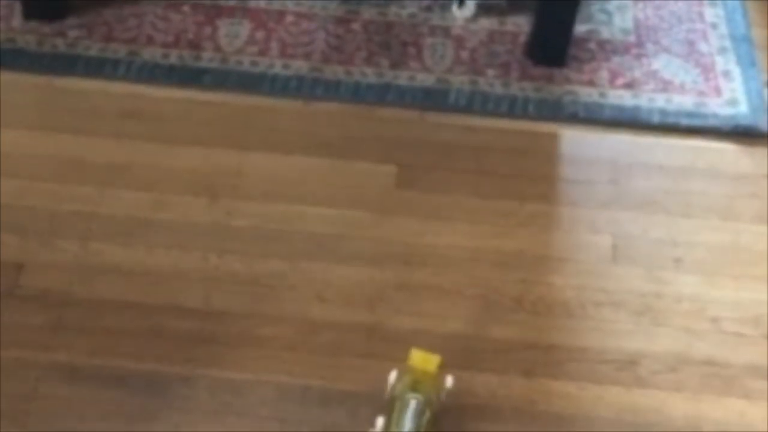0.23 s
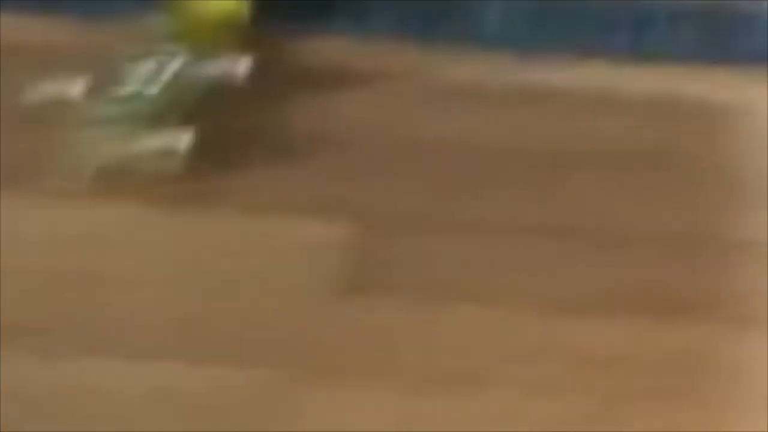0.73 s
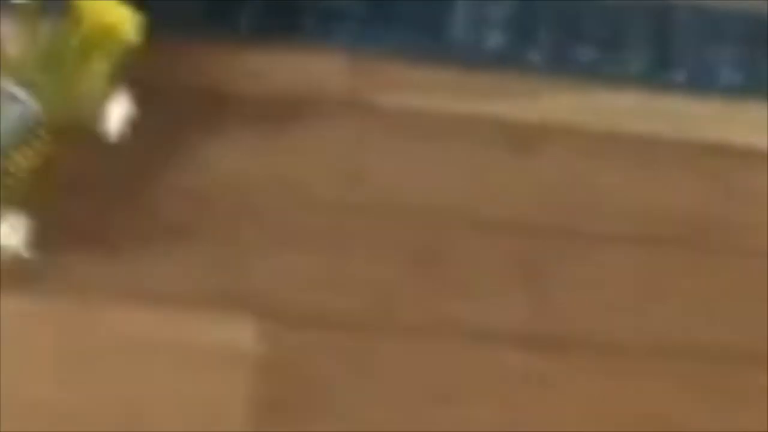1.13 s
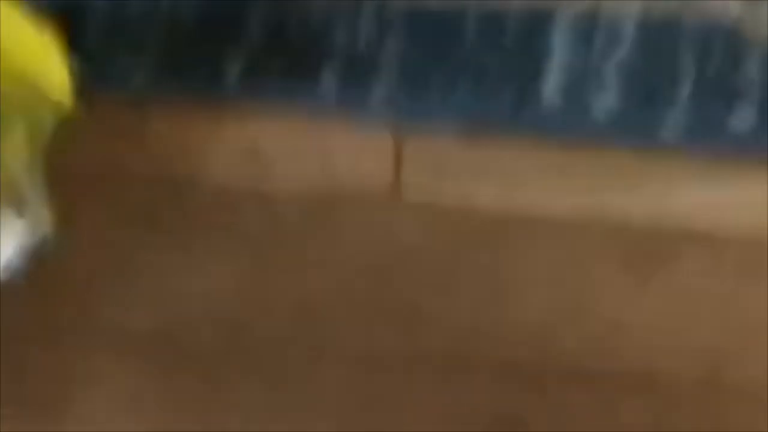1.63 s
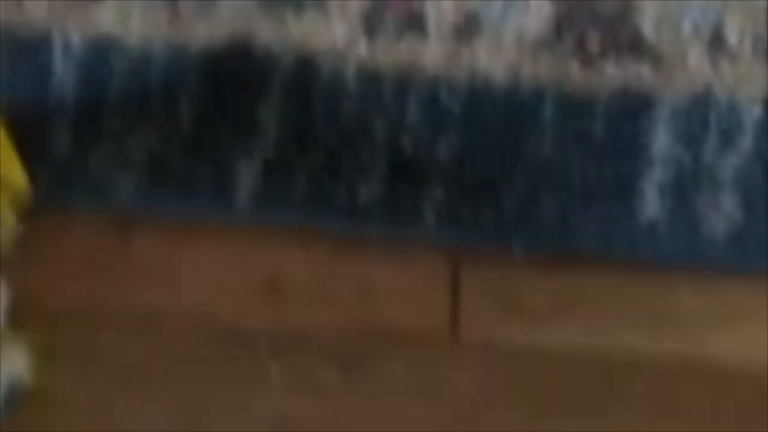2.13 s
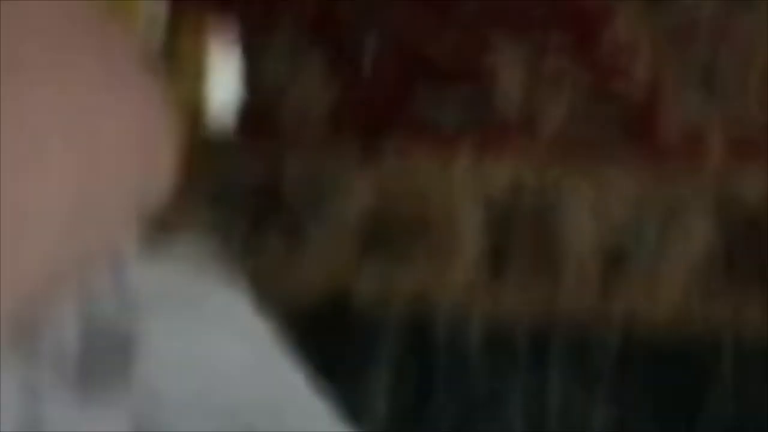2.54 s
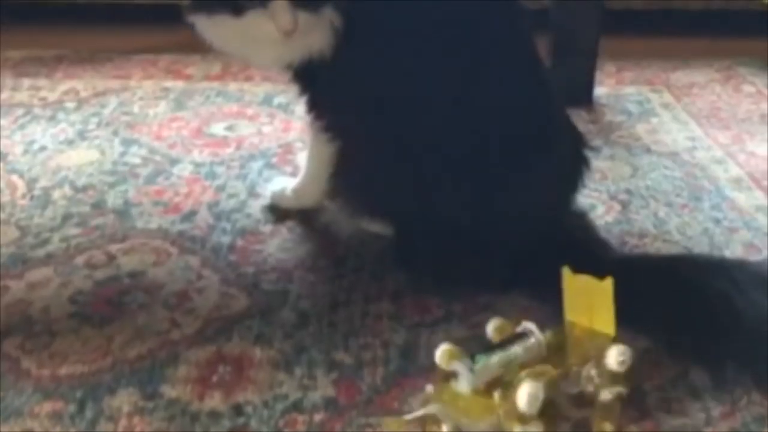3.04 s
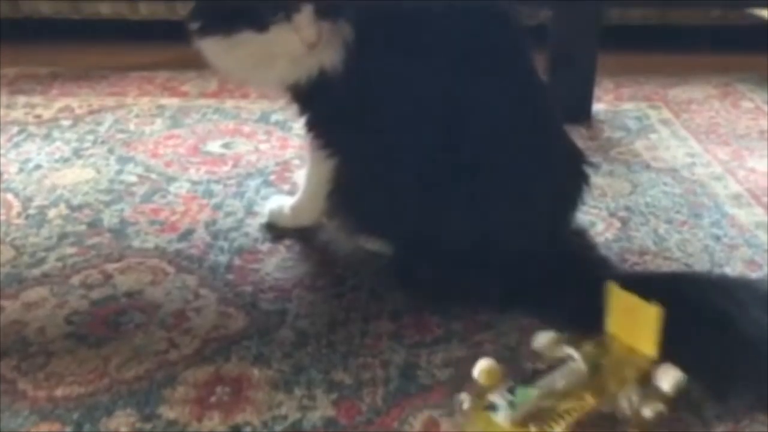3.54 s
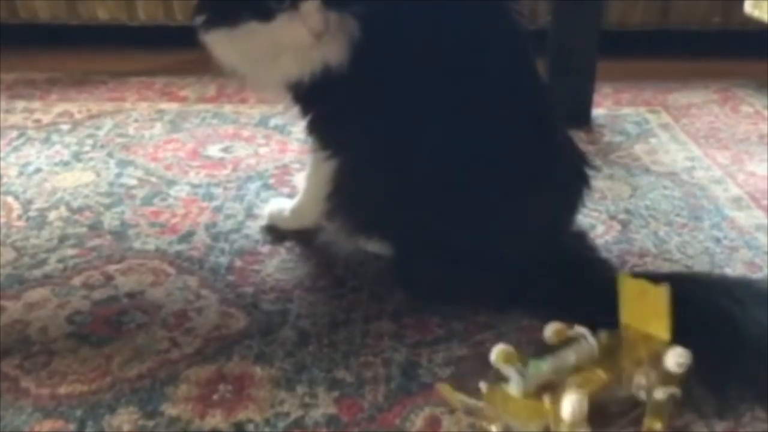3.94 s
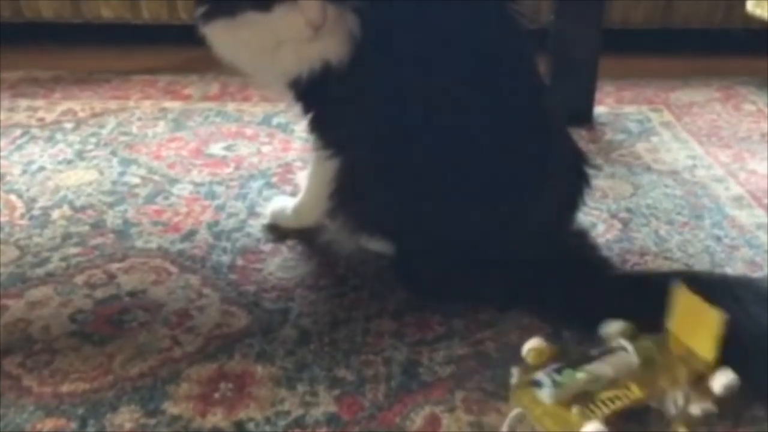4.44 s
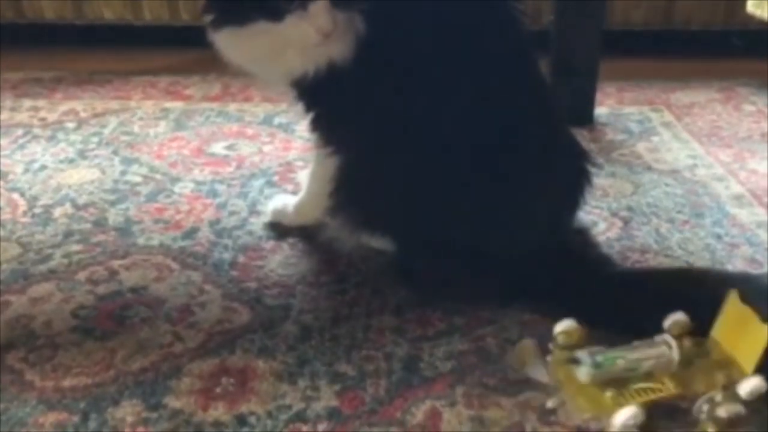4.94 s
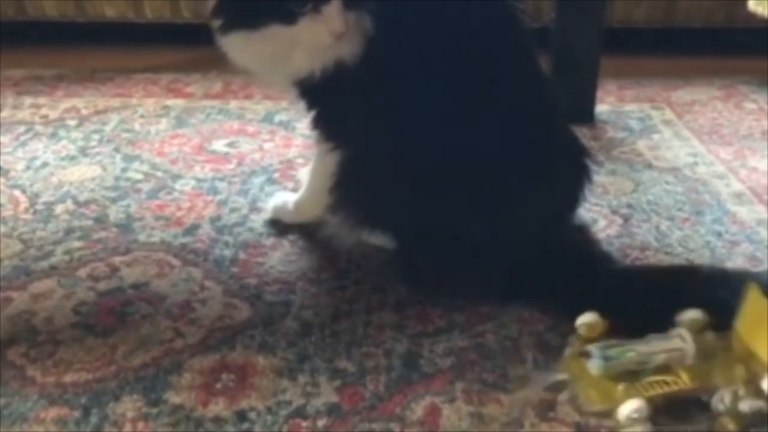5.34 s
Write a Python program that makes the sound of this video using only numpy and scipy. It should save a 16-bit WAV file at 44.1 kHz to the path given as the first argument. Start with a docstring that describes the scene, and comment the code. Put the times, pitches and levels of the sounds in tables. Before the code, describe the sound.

A small plastic toy robot clacks noisily over a wooden floor, quickening and growing louder, then whirs and ticks softly on a rug.

```python
"""A small battery toy robot walks over a hardwood floor, its plastic feet clacking, then onto a rug that mutes them.
Each footfall is damped ringing tones plus short noise bursts: floorboard, plastic shell and loose parts.
Its motor whines at the rate of the gear teeth; tooth ticks and noise through resonances make rattle and scrape.
Legs scuff and drag, gears catch and joints squeak. Soft sinking-pitch bumps sound close by.
A living room answers with fading noise tails, over low room noise and a faint hum."""
import sys
import numpy as np
from scipy import signal
from scipy.fft import rfft, irfft, next_fast_len
from scipy.io import wavfile
from scipy.ndimage import map_coordinates

SR = 44100
rng = np.random.default_rng(int(sys.argv[2]) if len(sys.argv) > 2 else 0)


def waveform_to_disk(signal):
    """Save audio, clipped to [-1, 1], as 16-bit WAV at the path in sys.argv[1]."""
    frames = np.transpose(np.atleast_2d(signal))
    scaled = np.clip(frames, -1, 1) * 32767
    samples = np.round(scaled).astype(np.int16)
    wavfile.write(sys.argv[1], SR, samples)


N = 245637

# Levels are in dB; most functions add their own offset to them.
# Foot and leg contacts: (time [s], overall level [dB], floorboard [dB], plastic shell [dB], snap [dB],
# rattle [dB], floor boom [dB], lower board tone [Hz], upper board tone [Hz], clack pitch [Hz],
# hardness of the contact as a treble limit [Hz])
FOOTFALLS = [(.048,-27.5,-22,-7.5,-9.5,-3,-47,786,1310,2390,4500),
             (.173,-36.5,-11,-4.5,-29,-16,-50,600,1240,2050,4020),
             (.261,-22.5,-10,-7.5,-10.5,-5,-48,550,696,1900,2400),
             (.426,-29.5,-20,-10.5,-10.5,0,-49,500,1150,2580,3500),
             (0.4803,-16.5,-20.5,-7,-19,-13,-42,700,1140,3680,7500),
             (.634,-30,-10.5,-9,-9,-19,-53,620,920,2240,4070),
             (0.6858,-15.5,-20.5,-13,-21,-6,-43,780,1140,2200,3320),
             (.829,-27.5,-6.5,-9.5,-7,-1.5,-42,894,1400,3100,5000),
             (.879,-13.5,-11.5,-13,-22,-13,-38.5,1007,1520,1940,3400),
             (1.073,-19.5,-4.5,-10.5,-10.5,-10.5,-52,880,1363,2070,2580),
             (1.104,-20.5,-10.5,-8.5,-24,-7.5,-41.5,785,1280,1580,2980),
             (1.255,-35,-4.5,-10,-15,-1,-57,1000,1380,2400,4000),
             (1.275,-22,-19,-10.5,-8,-2,-47,890,1430,2560,5000),
             (1.31,-14.5,-11,-14,-15.5,-12,-47,874,1075,2410,4800),
             (1.441,-18.5,-17.5,-14.5,-17.5,-5,-43,755,1310,1640,3800),
             (1.491,-31,-6.5,-14,-20,-9,-58,740,1300,1900,2980),
             (1.511,-13,-6,-14,-13.5,-21,-45,710,1254,1870,2780),
             (1.683,-29,-9.5,-11,-16,-10,-64,1050,1360,1900,3500),
             (1.708,-12,-20.5,-20.5,-13.5,-15,-42.5,680,1170,1900,3200),
             (1.738,-6.5,-18,-12,-19,-25,-36,1070,1460,3120,4400),
             (1.939,-7.5,-8.5,-25,-26,-21.5,-40,697,1253,2470,4170),
             (2.06,-19.5,-12,-7.5,-16,-18,-46,730,1070,1760,4000),
             (2.169,-13,-15.5,-14,-10,-7,-37,720,1140,2460,4500),
             (2.176,-13,-17,-10.5,-20,-14,-46,970,1480,2140,4000),
             (2.643,-12,-26.5,-12.5,-11,-12,-58,910,1420,4840,7000),
             (2.791,-23.5,-17,-13.5,-16,-3,-62,1050,1380,2600,6000),
             (4.988,-18.5,-33,-29,-14.5,-10,-53,915,1410,3270,5030)]
# Gear teeth and links catching: (time [s], level [dB], housing [dB], treble [dB], rise [s])
GEAR_CATCHES = [(0.802,-29.5,-25,-10,.004), (1.386,-28,-20,-14,0.00092), (1.66,-31,-22,-2,0.0032),
                (1.725,-30,-4,-3,0.00089), (1.877,-26.5,-17,-8,0.00082), (1.997,-27.5,-10,-1,.002),
                (2.152,-33,-2,-2,.003), (2.259,-28.5,-13,-0.5,.009), (2.3,-30.5,-16,-5,.003),
                (2.373,-30,-9.5,-6,0.0057), (2.416,-28,-7,-4,0.0033), (2.439,-24.5,-36,-8.5,0.01),
                (2.482,-34.5,-13,-2,0.0011), (2.55,-36,-4,-9,.003), (2.568,-27.5,-12,-4.5,0.0044),
                (2.654,-22,-16,-13,0.0026), (2.785,-29.5,-8,-0.5,0.0051), (2.811,-22.5,-15,-6,.008),
                (2.819,-23,-17,-11,0.00088), (2.868,-31,-24,-1,0.0024), (3.043,-35,-10,-7,.003),
                (3.134,-30,-13,-7.5,0.0046), (3.244,-31,-11,-7,0.0033), (3.275,-29,-10,-8,0.0025),
                (3.3167,-33.5,-12,-1.5,.003), (3.683,-31.5,-8.5,-5.5,0.0033), (3.91,-31.5,-7,-11,0.0048),
                (4.0544,-29.5,-14,-8,.004), (4.077,-30,-18,-7,0.0065), (4.1113,-35.5,-9,2.5,0.0031),
                (4.164,-36,-10,-3,0.0047), (4.191,-30.5,-6.5,-2.5,0.0038), (4.339,-36,-5,-6,0.0097),
                (4.503,-32,-23.5,-16,0.0035), (4.552,-33.5,-12,-4.5,0.0019), (4.866,-38.5,-16,0,0.0036),
                (5.0942,-30.5,-13,-7,0.0032), (5.479,-38.5,-5,1.5,0.0034)]
# Soft bumps: (time [s], level [dB], nominal pitch [Hz], time to fall 60 dB [s])
SOFT_BUMPS = [(.497,-35,270,0.039), (.703,-34.5,260,0.034), (.868,-27,292,0.027), (0.947,-32,171,.026),
              (1.130,-35.5,228,0.047), (1.618,-31,215,0.029), (1.678,-31.5,189,0.026),
              (2.122,-29,173,0.022), (2.404,-42,400,.015), (2.63,-28.5,410,0.022), (2.674,-43,199,0.037),
              (2.708,-28.5,268,0.023), (2.742,-31.5,217,0.023), (2.773,-28.5,240,.028),
              (2.795,-32,211,0.023)]
# Ringing tones of the plastic shell: (nominal pitch [Hz], level [dB], time to fall 60 dB [s])
SHELL_MODES = [(1870, -0.5, 0.025), (2165, 2.5, 0.0087), (2760, 8, 0.0049), (3070, -12.5, 0.03),
               (3670, -3, 0.015), (4140, -7, 0.0076), (4670, -9, 0.01)]
# Resonances of the gearbox: (centre [Hz], width [Hz], level [dB])
GEARBOX_PEAKS = [(1048, 160, -1), (1434, 134, -1.5), (1716, 137, -4.5), (2120, 270, -4.5), (2662, 410, 1),
                 (3050, 770, -3), (5050, 800, -4)]
# Resonances of the motor housing: (centre [Hz], width [Hz], level [dB])
HOUSING_PEAKS = [(2780, 250, -3.5), (3106, 146, 1), (3280, 290, 0), (4980, 190, -12)]
# Resonances of the slot a leg slides in: (centre [Hz], width [Hz], level [dB])
SLOT_PEAKS = [(6020, 440, 1), (6680, 370, -0.99), (7500, 500, -2.2), (8700, 1100, -0.36), (9620, 320, 0.16)]
# Low resonances of the whole floor: (centre [Hz], width [Hz], level [dB])
FLOOR_PEAKS = [(171, 51, 0), (300.5, 43, 3.5), (557, 440, -6)]
# Tone colour of the gear rattle: (frequency [Hz], level [dB])
RATTLE_COLOUR = [(500, -69), (900, 1), (1050, 1.5), (1600, 7), (3400, 0), (4000, 0), (5200, 1.5), (7000, 8),
                 (12000, -7)]
# Tone colour of the linkage scrape: (frequency [Hz], level [dB])
SCRAPE_COLOUR = [(2500, -16), (4200, -2), (5100, 3.5), (6200, 3), (7300, -2), (8700, 4), (10200, -0.5),
                 (11600, -8)]
# Tone colour of the snap in a footfall: (frequency [Hz], level [dB])
SNAP_COLOUR = [(1500, -14), (4000, -5.5), (5600, 4), (7200, 0.5), (9000, -0.5), (11500, -4.5)]
# Tone colour of the deep floor rumble: (frequency [Hz], level [dB])
RUMBLE_COLOUR = [(30, -54), (90, -22), (140, 1.5), (195, 4), (300, -4.5), (450, -11), (800, -16)]
# Tone colour of the floor buzz: (frequency [Hz], level [dB])
BUZZ_COLOUR = [(200, -8.5), (420, 2.5), (720, 7), (1000, 4.5), (1400, -1), (2500, -25)]
# Tone colour of the room noise: (frequency [Hz], level [dB])
AIR_COLOUR = [(22, -21), (45, -6), (60, 1.5), (70, 1), (90, -1.5), (130, -2), (250, -23), (600, -24.5),
              (3000, -18.5), (12000, -37)]
# Tone colour of the room's answer: (frequency [Hz], level [dB])
ECHO_COLOUR = [(60, -9), (130, -0.5), (220, -34), (420, -12.5), (700, -4), (1500, -2.5), (4000, 1.5),
               (11000, 3)]
# How long the room's answer lasts: (frequency [Hz], time to fall 60 dB [s])
ECHO_DECAY = [(150, 1), (600, 0.58), (2500, 0.35), (6000, 0.18), (11000, 0.27)]
# Each stride starts as a leg slides back in its slot:
# (time [s], scuff level [dB], extra strain that lifts the rubbing [dB])
STRIDE_STARTS = [(-.03, -55, -13), (0.393, -51, 7), (0.789, -48, -15), (1.219, -50, -9), (1.641, -48, -2.5),
                 (1.989, -55, 13.5), (2.649, -57, -11), (2.873, -46.5, 6), (3.309, -50.5, 5),
                 (3.743, -51, 4), (4.177, -49, -1), (4.606, -48, -2.5), (5.04, -48, 5), (5.478, -49, -2)]
# Every turn of the crank works the links: (time into the stride [s], rubbing [dB])
CRANK_RUBBING = [(.02,3),(.09,-5.5),(.16,2.5),(.21,-1.5),(.27,2),(.345,1),(.364,-9),(.38,-1.5),(.41,-4)]
# Motor speed before small drifts, sagging under load: (time [s], tooth rate [Hz])
TOOTH_RATE = [(2.78, 1057), (2.8, 1082), (2.83, 1028), (2.91, 1095), (3.02, 1095), (3.27, 1032),
              (3.29, 1083), (3.46, 1104), (3.47, 1081), (3.64, 1049), (3.66, 1080), (3.88, 1105),
              (3.91, 1040), (3.99, 1067), (4.04, 1043), (4.12, 1088), (4.19, 1045), (4.27, 1087),
              (4.49, 1055), (4.78, 1088), (4.99, 1040), (5.02, 1076), (5.16, 1080), (5.17, 1036),
              (5.2, 1112), (5.23, 1062), (5.41, 1055), (5.44, 1098), (5.55, 1094), (5.57, 1120)]
# Loudness of the drive as the toy moves about:
# (time [s], gear rattle [dB], housing ring [dB], linkage scrape [dB])
DRIVE_LEVELS = [(0.0, -54, -47, -50), (0.31, -53.5, -62.5, -73), (0.74, -53, -59, -72.5),
                (0.88, -50.5, -50.5, -61), (1.16, -55, -60, -51), (1.3, -52, -50.5, -50),
                (2.11, -51, -58.5, -48), (2.28, -60, -56.5, -49), (2.45, -60.5, -72, -56),
                (2.74, -53, -54, -47.5), (2.95, -53.5, -55, -54.5), (3.99, -54.5, -54.5, -54),
                (4.78, -54.5, -53.5, -51), (5.18, -54, -56, -49.5), (5.57, -55.5, -54.5, -49.5)]
# Motor shaking the floor: (time [s], rumble [dB], buzz [dB])
FLOOR_SHAKE = [(0, -54, -58), (1.15, -50.5, -60), (1.35, -45.5, -56), (1.77, -53, -60),
               (2.15, -46.5, -45.5), (2.27, -64, -63.5), (2.9, -58.5, -71.5), (5.57, -58, -71)]
# Dry leg joints squeak: (time [s], length [s], pitch [Hz], width [Hz], level [dB])
JOINT_SQUEAKS = [(0,0.25,2710,170,-61), (.386,0.07,5900,170,-54), (.783,0.035,5900,170,-53),
                 (1.634,.034,5860,170,-50), (2.413,.07,2830,90,-49.5), (2.48,.1,2900,91,-54),
                 (2.615,.028,5450,200,-52), (2.648,0.12,3045,250,-48.5), (2.654,0.037,8700,350,-41),
                 (2.809,.061,2074,130,-46), (3.16,0.037,3188,119.7,-48), (3.57,0.051,3260,120,-48),
                 (4.02,.088,3200,120,-52), (4.116,0.064,3270,150,-48), (4.183,.02,3190,150,-45)]
# The motor strains as the legs push the body up:
# (time of the hardest point [s], rise [s], fall [s], strain [dB])
BODY_PUSHES = [(2.83,0.046,.05,-4), (2.91,.061,0.054,-6.5), (3.14,0.096,0.1,0.5), (3.21,.03,.04,-5),
               (3.282,0.019,0.017,-2), (3.325,0.021,0.037,-7), (3.565,0.12,0.09,-0.5),
               (3.781,0.045,.045,-7.5), (3.859,0.023,0.024,-7), (4.004,0.076,0.059,-0.5),
               (4.07,0.048,0.06,-4), (4.168,.059,0.053,-2), (4.24,.03,0.044,-6.5), (4.45,0.16,0.046,2),
               (4.495,.02,0.039,-1.5), (4.885,.12,0.1,-2), (5.015,0.027,0.024,-7.5),
               (5.095,0.051,0.021,-0.5), (5.315,.11,.1,-0.5)]
# Feet drag over the floor: (time [s], length [s], centre [Hz], width [Hz], level [dB])
FOOT_DRAGS = [(1.971,0.07,1780,1200,-42), (2.665,.06,1350,900,-47), (2.716,0.174,4850,1200,-49),
              (2.722,0.195,1650,1820,-54.5), (3.086,0.1,450,600,-60)]

TEETH = 8  # on the motor's pinion (small gear)
TOP_HZ = 11950  # upper limit of the final sound
STRIDE_S, SLIDE_S = 0.43, 0.084  # one turn of the crank; length of the scuff
WHINE_WOOD_DB, WHINE_RUG_DB = -62.5, -50.5  # the pile makes the motor work harder
RUG_EDGE_S, ON_RUG_S = 2.4, 2.8  # the front feet reach the rug; all feet are on it
CLOSE_S = .75  # the toy is farther off, and more of the room is heard, until then
CONTACT_LAG_S = 0.000989  # every footfall's knock and clack sound this long after its table time


def amp(db):
    """Turns decibels into a gain."""
    return 10 ** (np.asarray(db) / 20)


def unit(x):
    """Scales a sound to an average (rms) strength of 1."""
    return x / np.sqrt(np.mean(x ** 2) + 1e-20)


def along(points, hz):
    """Reads (frequency, value) points on a logarithmic frequency axis."""
    f, v = np.transpose(points)
    return np.interp(np.log(hz + 1), np.log(f + 1), v)


def curves(rows):
    """Joins the points of each column after the time by straight lines, one value per sample."""
    s, *cols = np.transpose(rows)
    return [np.interp(np.arange(N) / SR, s, c) for c in cols]


def wobble(rate):
    """A smooth random curve through `rate` random points a second."""
    knots = rng.standard_normal(int(N * rate / SR) + 4)
    return map_coordinates(knots, [np.arange(N) * rate / SR])


def filtered(x, response):
    """Multiplies each frequency in x by a gain, which may also shift its phase."""
    m = next_fast_len(len(x) + 8192)
    return irfft(rfft(x, m) * response(np.fft.rfftfreq(m, 1 / SR)), m)[:len(x)]


def coloured(x, spectrum):
    """Gives x a tone colour, at rms 1."""
    return unit(filtered(x, lambda hz: amp(along(spectrum, hz))))


def resonant(x, peaks):
    """Sends x through a set of resonances with alternating signs, at rms 1."""
    def response(f):
        total = 0
        for k, (centre, width, db) in enumerate(peaks):
            peak = 1j * f * width / (centre * centre - f * f + 1j * f * width)
            total = total + (-1) ** k * amp(db) * peak
        return total
    return unit(filtered(x, response))


def add(track, s, sound):
    """Mixes a sound into the track at time s."""
    start = max(round(s * SR), 0)
    track[start:start + len(sound)] += sound[:max(N - start, 0)]


def burst(t, t60):
    """Noise that dies away by 60 dB in t60 seconds."""
    return rng.standard_normal(len(t)) * amp(-60 * t / t60)


def slips(rate_hz=135, depth_db=12):
    """Uneven stick and slip: a gain that jumps up at each slip and dies away."""
    slip_rate = rate_hz * amp(2.7 * wobble(100))
    since_slip = np.cumsum(slip_rate) / SR % 1  # 0 to 1 between slips
    return unit(amp(-depth_db * since_slip))


def shifting(x, depth_s=.0007, rate=13):
    """Resonances of loose parts slide slightly up and down as they flex, by a wandering delay."""
    return map_coordinates(x, [np.arange(N) + depth_s * SR * wobble(rate)], mode="mirror")


def room(x):
    """The room's answer: a new random noise tail each time, with its own decay at each frequency."""
    hz, t, z = signal.stft(rng.standard_normal(SR // 2), SR, nperseg=256)
    decay = amp(-60 * t / along(ECHO_DECAY, hz)[:, None])
    onset = 1 - np.exp(-t / 0.002)
    tail = signal.istft(z * decay * onset, SR, nperseg=256)[1]
    tail = filtered(tail / np.linalg.norm(tail), lambda f: amp(along(ECHO_COLOUR, f)))
    return signal.fftconvolve(x, tail)[:len(x)]


def background(air_db=-62, hum_db=-69, hum_hz=70):
    """Low room noise with a faint hum whose phase drifts a little."""
    phase = 2 * np.pi * hum_hz * np.arange(N) / SR + .5 * wobble(4.6)
    hum = np.sqrt(2) * np.sin(phase)
    air = coloured(rng.standard_normal(N), AIR_COLOUR)
    return amp(air_db) * air + amp(hum_db) * hum


def bumps(level_db=2, sag=2.44, sink_share=0.088, puff_db=-10):
    """Dull, padded thumps with a puff of noise; their pitch sinks as they die."""
    out, t = np.zeros(N), np.arange(SR // 8) / SR
    for s, db, hz, t60 in SOFT_BUMPS:
        sinking_hz = hz * (0.47 + sag * np.exp(-t / (sink_share * t60)))
        thump = np.sin(2 * np.pi * np.cumsum(sinking_hz) / SR)
        puff = amp(puff_db) * resonant(rng.standard_normal(len(t)), [(hz, 250, 0)])
        fade = amp(db + level_db - 60 * t / t60) * (1 - np.exp(-t / 0.0028))
        add(out, s, fade * (thump + puff))
    return out + amp(-6.0) * room(out)


def floorboards(rumble_db=-1.5, buzz_db=1):
    """The running motor shakes bare boards through the legs; the rug damps this."""
    low_db, mid_db = curves(FLOOR_SHAKE)
    rumble = amp(low_db + rumble_db) * coloured(rng.standard_normal(N), RUMBLE_COLOUR)
    uneven = rng.standard_normal(N) * amp(6.3 * np.minimum(wobble(80), 1.5))
    buzz = amp(mid_db + buzz_db) * coloured(uneven, BUZZ_COLOUR)
    return rumble + buzz


def squeaks(room_db=-8, hoarse_db=5, flutter=.014):
    """A joint sticks and slips: a fluttering tone in a narrow, hoarse band of noise."""
    out = np.zeros(N)
    for s, length, hz, width_hz, db in JOINT_SQUEAKS:
        size = int(length * SR)
        pitch = hz * (1 + flutter * wobble(144)[:size])
        tone = np.sin(2 * np.pi * np.cumsum(pitch) / SR)
        tone = unit(tone * amp(3.7 * wobble(108)[:size]))
        rub = resonant(rng.standard_normal(SR // 2), [(hz, width_hz, 0)])[:size]
        squeak = unit(tone + amp(hoarse_db) * rub)
        add(out, s, amp(db) * squeak * signal.windows.tukey(size, .5))
    return out + amp(room_db) * room(out)


def drags():
    """A dragging foot gives a broad, grainy rustle: noise in a band, broken up by slips."""
    out = np.zeros(N)
    for s, length, hz, width_hz, db in FOOT_DRAGS:
        size, band = int(length * SR), [(hz, width_hz, 0)]
        rustle = resonant(resonant(rng.standard_normal(size), band), band)
        add(out, s, amp(db) * rustle * signal.windows.tukey(size, .4))
    return out * slips()


def slides(level_db=-1):
    """Plastic rubs on plastic in a short, bright scuff as a leg slides in its slot."""
    t, stroke = np.arange(N) / SR, np.zeros(N)
    for s, db, _ in STRIDE_STARTS:
        progress = np.clip((t - s) / SLIDE_S, 0, 1)
        stroke += amp(db) * np.sqrt(np.clip(np.sin(np.pi * progress), 0, 1))
    return amp(level_db) * stroke * resonant(rng.standard_normal(N) * slips(), SLOT_PEAKS)


def gearbox(x):
    """The hollow plastic gearbox rings at its resonances and radiates little bass."""
    return coloured(resonant(x, GEARBOX_PEAKS), RATTLE_COLOUR)


def catches(gear_db=-37, housing_db=-25, treble_db=-27, room_db=-7,
            housing_t60=0.019, gear_t60=0.038, treble_t60=0.052):
    """Slack in the drive takes up with a short rasp that swells and dies."""
    out, t = np.zeros(N), np.arange(SR // 2) / SR
    for s, db, housing, treble, rise_s in GEAR_CATCHES:
        after = np.maximum(t - rise_s, 0)
        swell = np.minimum(t / rise_s, 1)
        rasp = amp(gear_db) * gearbox(burst(after, gear_t60) * swell)
        rasp += amp(housing + housing_db) * resonant(burst(after, housing_t60) * swell, HOUSING_PEAKS)
        rasp += amp(treble + treble_db) * coloured(burst(after, treble_t60) * swell, SCRAPE_COLOUR)
        add(out, s, amp(db) * (rasp + amp(room_db) * room(rasp)))
    return out


def strain(idle_db=-12.5):
    """Load on the motor, about 1 in a hard push, never below that of idle running."""
    t, load = np.arange(N) / SR, np.full(N, amp(idle_db))
    for s, rise, fall, db in BODY_PUSHES:
        offset = np.clip((t - s) / np.where(t < s, rise, fall), -1, 1)
        load = np.maximum(load, amp(db) * np.cos(np.pi / 2 * offset))
    return load


def stride_time():
    """For each sample: seconds since the present stride began, and that stride's extra strain in dB."""
    t = np.arange(N) / SR
    starts, _, extra_db = np.transpose(STRIDE_STARTS)
    now = np.maximum(np.searchsorted(starts, t) - 1, 0)
    return t - starts[now], extra_db[now]


def crank(rub_grows=0.21):
    """Rubbing in dB: every stride has the same pattern, lifted in a hard one."""
    since, extra_db = stride_time()
    return np.interp(since, *np.transpose(CRANK_RUBBING), period=STRIDE_S) + rub_grows * extra_db


def whine(load, drift_hz=3, octave_db=-17, third_db=-12, eccentric=0.1):
    """Meshing teeth sing louder under strain as the motor slows; also gives the motor shaft's turns."""
    mesh_hz = curves(TOOTH_RATE)[0] + drift_hz * wobble(14)
    mesh_db = np.interp(np.arange(N) / SR, [RUG_EDGE_S, ON_RUG_S], [WHINE_WOOD_DB, WHINE_RUG_DB])
    turns = np.cumsum(mesh_hz * (1 + .014 * load * wobble(130))) / SR / TEETH
    tooth = 2 * np.pi * TEETH * turns
    # an off-centre pinion adds a tone higher by one shaft rate
    tone = np.sin(tooth) + eccentric * np.sin(tooth + 2 * np.pi * turns)
    tone += amp(octave_db) * np.sin(2 * tooth) + amp(third_db) * np.sin(3 * tooth)
    return amp(mesh_db) * load * unit(tone * amp(2.1 * wobble(90))), turns


def tooth_ticks(turns, scatter_db, wander, swing_db):
    """One tick per tooth, uneven in size and time (wander in s), its strength swinging once a turn."""
    at = np.flatnonzero(np.diff(np.floor(turns * TEETH)))
    size, late = rng.standard_normal((2, N // 20))[:, :len(at)]
    where = np.clip(at + np.round(late * wander * SR).astype(int), 0, N - 1)
    tick_db = scatter_db * np.minimum(size, 2) + swing_db * np.cos(2 * np.pi * turns[at])
    return unit(np.bincount(where, amp(tick_db), N))


def drive(rattle_db=1, housing_db=0.0, scrape_db=-2.5, rattle_follows=0.21, housing_follows=1.3,
          scrape_follows=1.0, slide=1.0, room_db=-7):
    """The pinion sings at the tooth rate, rattles the gearbox and works the leg linkage."""
    load, rub_db = strain(), crank()
    tone, turns = whine(load)
    gear_db, ring_db, link_db = curves(DRIVE_LEVELS)
    # loose parts bind and free themselves, all shaken together, harder under load
    judder = 1.2 * wobble(65) + 1.43 * load - 1.2

    def teeth():
        ticks = tooth_ticks(turns, scatter_db=6.0, wander=.00022, swing_db=2.0)
        return ticks + 0.4 * rng.standard_normal(N)

    rattle = amp(gear_db + rattle_db + rattle_follows * rub_db + judder)
    rattle *= shifting(gearbox(teeth())) * slips(rate_hz=61, depth_db=2)
    housing = amp(ring_db + housing_db + housing_follows * rub_db + judder + 0.5 * wobble(90))
    housing *= shifting(resonant(teeth(), HOUSING_PEAKS))
    friction = slide * rng.standard_normal(N) * amp(3.7 * np.cos(2 * np.pi * turns))
    link_ticks = tooth_ticks(turns, scatter_db=16.5, wander=0.00023, swing_db=-5.0)
    scrape = coloured(link_ticks + friction, SCRAPE_COLOUR)
    scrape *= amp(link_db + scrape_db + scrape_follows * rub_db + 0.73 * judder + 2.46 * wobble(140))
    whirr = rattle + housing + scrape
    return tone + whirr + amp(room_db) * room(whirr)


def booms(level_db=-13.5, joists_near_db=-8, joists_far_db=1, rise_s=0.0042):
    """The whole floor gives slowly under each footfall: low noise that swells and fades."""
    out, t = np.zeros(N), np.arange(SR // 2) / SR
    for s, _, _, _, _, _, boom_db, *_ in FOOTFALLS:
        joists_db = joists_far_db if s < CLOSE_S else joists_near_db
        boom = coloured(burst(t, t60=0.15), RUMBLE_COLOUR)
        boom += amp(joists_db) * resonant(burst(t, t60=0.36), FLOOR_PEAKS)
        add(out, s, amp(level_db + boom_db) * boom * (1 - np.exp(-t / rise_s)) ** 2)
    return out


def board_ring(t, lower_hz, upper_hz, upper_db=-2.5, noise_db=-4, low_cut_hz=440):
    """The board's two main tones at the spot that is struck; it radiates little bass."""
    def mode(hz, t60):
        return unit(np.sin(2 * np.pi * hz * t) * amp(-60 * t / t60) * (1 - np.exp(-t / 0.0024)))

    tones = unit(mode(lower_hz, t60=0.015) - amp(upper_db) * mode(upper_hz, t60=0.012))
    middle_hz = np.sqrt(lower_hz * upper_hz)
    wood = tones + amp(noise_db) * resonant(burst(t, t60=0.025), [(middle_hz, 1000, 0)])
    return unit(signal.sosfilt(signal.butter(3, low_cut_hz, "high", fs=SR, output="sos"), wood))


def ring(modes, t, near_hz, falloff_db):
    """Fading tones; the spot that is struck favours those near one pitch."""
    hz, db, t60 = np.transpose(modes)[:, :, None]
    size, detune, side = rng.standard_normal((3, len(modes), 1))
    level = db + 2 * size - falloff_db * abs(np.log2(hz / near_hz))
    tones = np.sin(2 * np.pi * hz * (1 + 0.061 * detune) * t)
    return np.sum(np.sign(side) * amp(level - 60 * t / t60) * tones, axis=0)


def shell_clack(t, clack_hz, hard_hz, tick_db=2, noise_db=-2, gear_db=-4):
    """A tight tick and the shell's ring; a softer contact takes the top off both."""
    tick = unit(np.sin(2 * np.pi * clack_hz * t) * amp(-60 * t / 0.005))
    grit = resonant(burst(t, t60=0.0074), [(clack_hz, 900, 0)])
    plastic = unit(ring(SHELL_MODES, t, clack_hz, falloff_db=5))
    plastic += amp(tick_db) * tick + amp(noise_db) * grit
    plastic += amp(gear_db) * gearbox(burst(t, t60=0.065))
    return unit(signal.sosfilt(signal.butter(3, min(hard_hz, SR / 3), fs=SR, output="sos"), plastic))


def rebounds(t, rate_hz=260, t60=0.27, scatter_db=4, wait_s=0.0036):
    """Sparse, uneven kicks of loose parts bouncing after a blow, of total energy 1."""
    chance, size = rng.random(len(t)), rng.standard_normal(len(t))
    side = rng.choice([-1, 1], len(t))
    happens = (chance < rate_hz / SR) * (t > wait_s)
    kicks = happens * side * amp(scatter_db * np.minimum(size, 1.5) - 60 * t / t60)
    return kicks / (np.linalg.norm(kicks) + 1e-9)


def steps(board_db=-22.5, shell_db=-22.0, snap_db=-22, chatter_db=-17, rattle_db=-1, room_db=-6.5,
          far_db=3, board_room_db=-4.5):
    """Each footfall knocks the board, rings the shell and sets loose parts rattling."""
    out, t = np.zeros(N), np.arange(SR // 2) / SR
    for s, db, board, shell, snap, rattle, _, lower_hz, upper_hz, clack_hz, hard_hz in FOOTFALLS:
        knock = amp(board + board_db) * board_ring(t, lower_hz, upper_hz)
        clack = amp(shell + shell_db) * shell_clack(t, clack_hz, hard_hz)
        chatter = amp(chatter_db) * burst(t, t60=0.11)
        crack = amp(snap + snap_db) * coloured(burst(t, t60=0.015) + chatter, SNAP_COLOUR)
        toy = clack * (1 - np.exp(-t / 0.00039)) + crack * (1 - np.exp(-t / 0.00045))
        # the knock and a short tap are repeated by the bouncing parts
        tap = amp(shell + shell_db) * resonant(burst(t, t60=0.0035), [(clack_hz, 1500, 0)])
        loose = amp(rattle + rattle_db) * signal.fftconvolve(knock + tap, rebounds(t))[:len(t)]
        echo = amp(room_db + far_db * (s < CLOSE_S)) * room(toy + amp(board_room_db) * knock)
        add(out, s + CONTACT_LAG_S, amp(db) * (knock + toy + loose + echo))
    return out


def scene():
    """The toy and the room, in mono."""
    surroundings = background() + bumps() + floorboards()
    legs = squeaks() + drags() + slides()
    mechanism = catches() + drive()
    footfalls = booms() + steps()
    return (surroundings + legs + mechanism + footfalls)[None]


def record(dry):
    """A very steep low-pass filter takes away the treble above TOP_HZ."""
    def low_pass(hz):
        return 1 / np.sqrt(1 + (hz / TOP_HZ) ** 160)
    return np.array([filtered(x, low_pass) for x in dry])


dry = scene()
out = record(dry)
waveform_to_disk(out)
```